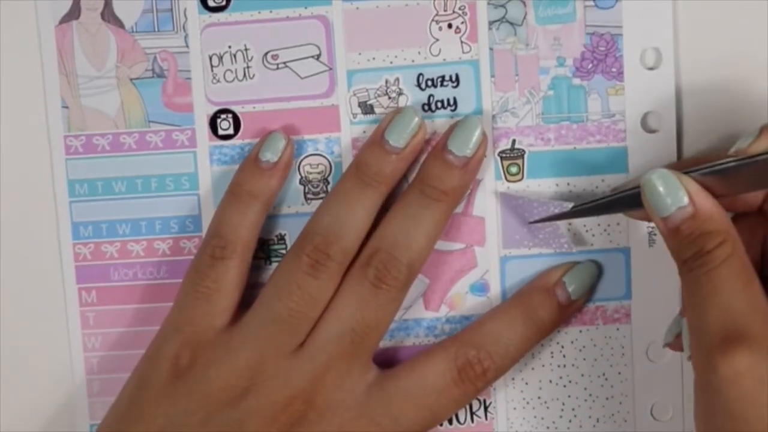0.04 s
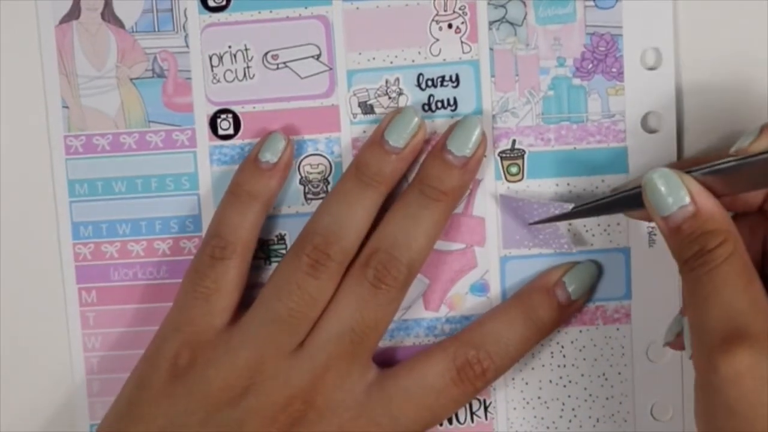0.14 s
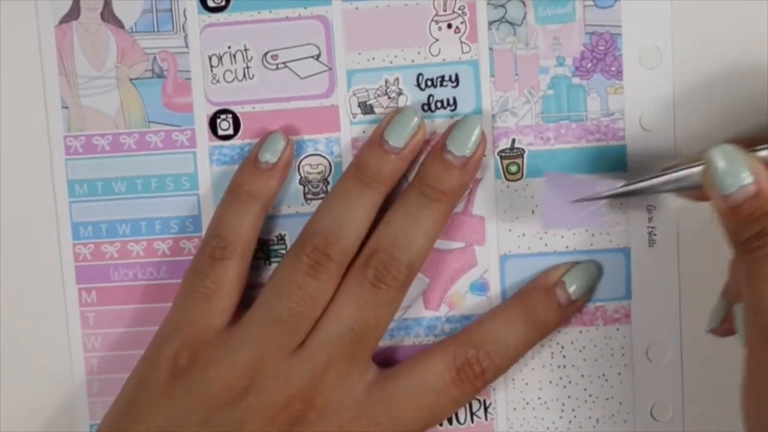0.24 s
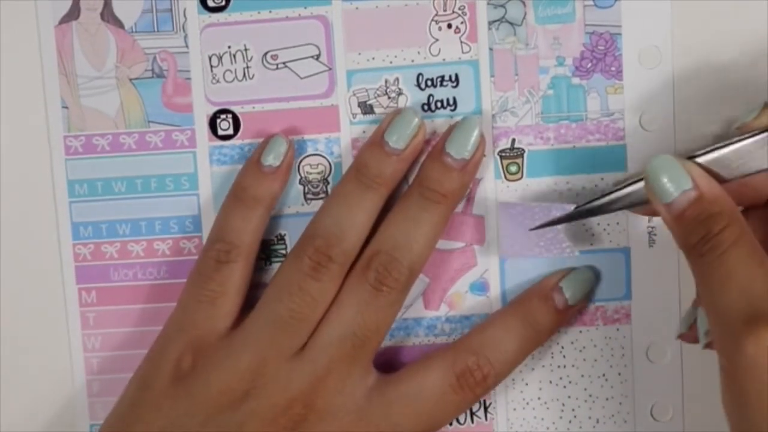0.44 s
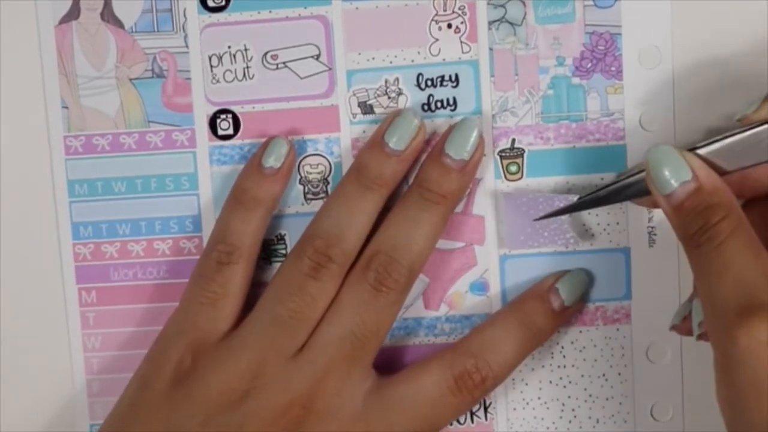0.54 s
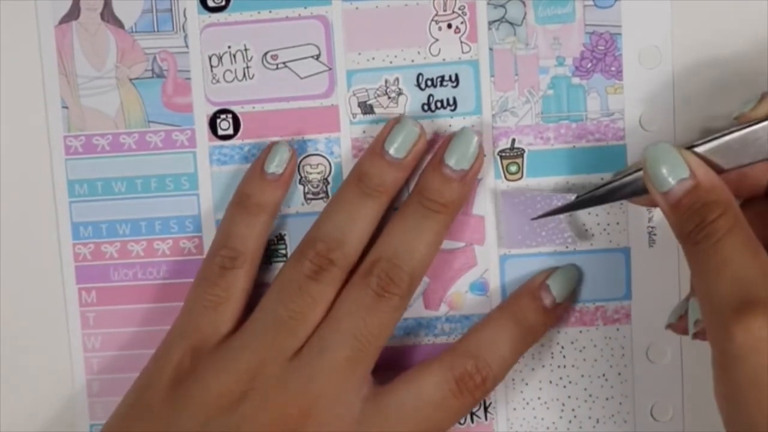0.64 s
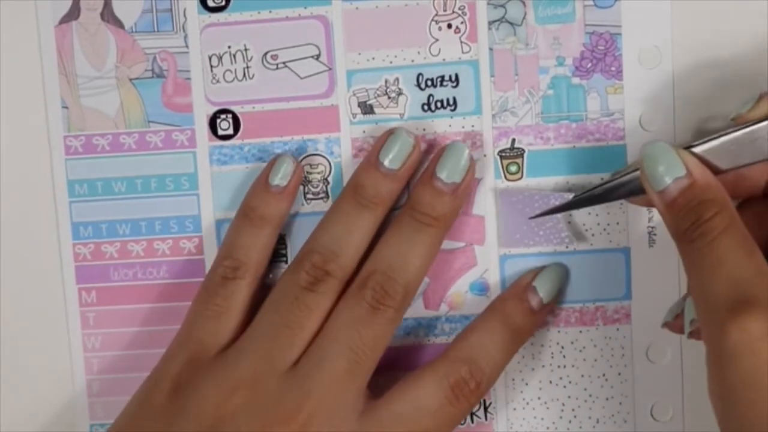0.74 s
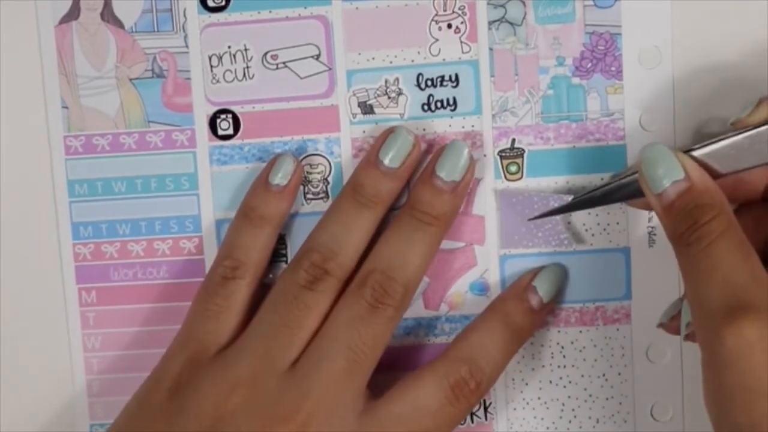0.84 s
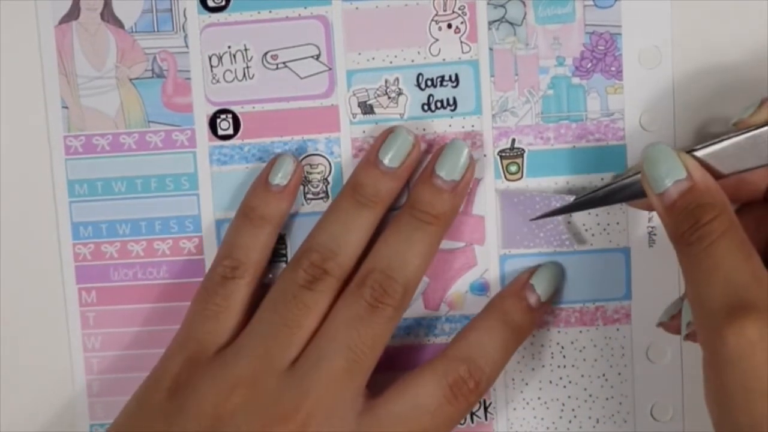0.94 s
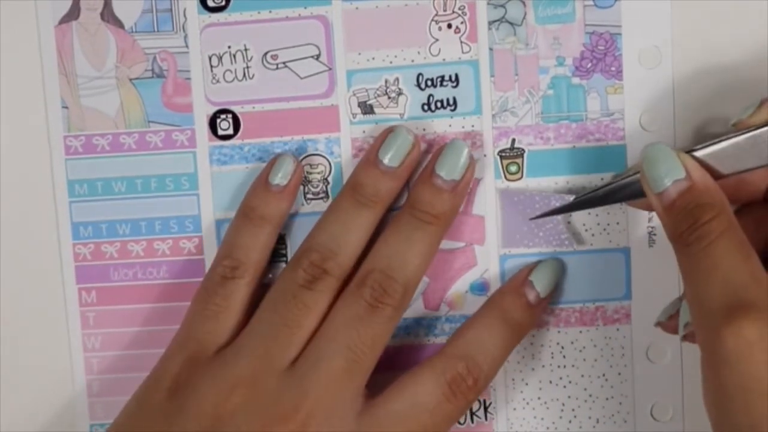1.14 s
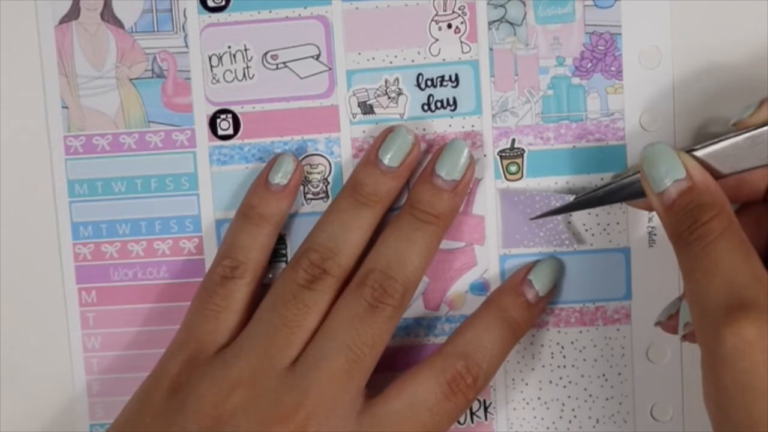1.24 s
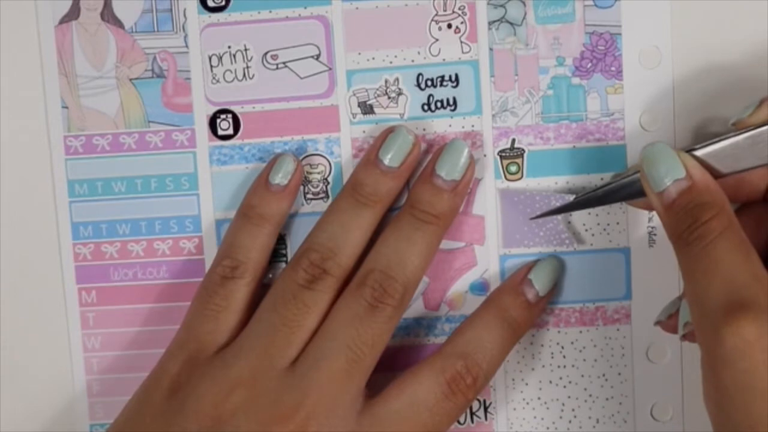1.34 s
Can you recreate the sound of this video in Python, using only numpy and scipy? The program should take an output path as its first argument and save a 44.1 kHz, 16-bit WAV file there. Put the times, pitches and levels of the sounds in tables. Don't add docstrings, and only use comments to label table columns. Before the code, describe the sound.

Close stereo microphones at a desk catch glue ticking apart under a sticker, a sharp clipped snap with a small thump and room echo, then a brief paper slide, tiny squeak and gentle touchdown.

```python
import sys
import numpy as np
from scipy import signal
from scipy.io import wavfile

SR = 44100
rng = np.random.default_rng(int(sys.argv[2]) if len(sys.argv) > 2 else 0)


def pcm_store(signal):
    levels = np.round(np.clip(np.atleast_2d(signal), -1, 1) * 32767)
    wavfile.write(sys.argv[1], SR, levels.astype(np.int16).T)


def boost_factor(decibels):
    exponent = np.asarray(decibels, float) / 20
    return 10 ** exponent


N = 61739
TIME_S = np.arange(N) / SR

SNAP_DB = -1.5
SHEET_THIN_HZ, TICK_THIN_HZ = 900, 2094

TICK_TIMES = [.0140, .0316, .0515, .0625, .0748, .0998, .1072, .1283, .1370, .1545, .1598, .1615, .1775,
              .1970, .2032, .2232]
# peak_db, pitch_hz, brightness_db
TICK_SOUNDS = [(-43, 4100, 1), (-31.5, 3370, -1), (-45, 2250, -9.5), (-38, 3800, 0), (-34.5, 2800, -18),
               (-35.5, 3200, -12.5), (-30.5, 2750, 3), (-42.5, 3000, -3.5), (-30.5, 2790, 1.5),
               (-43, 2200, -5), (-42.5, 2140, -8.5), (-27.5, 2860, 1), (-36.5, 2750, -14),
               (-30, 2800, -0.5), (-39.5, 3800, -15.5), (-39, 2900, -12.5)]
TOUCH_TIMES = [.7020, .7030, .7105]
# peak_db, pitch_hz, brightness_db
TOUCH_SOUNDS = [
    (-32.5, 5000, -11.5),
    (-34.5, 4000, -14.5),
    (-35.5, 1460, -4),
]
SLIP_TIMES = [.2283, .2302, .2310, .2332, .2352, .2367, .2385, .2415, .2445]


def rms_one(x):
    return x / np.sqrt(np.mean(x ** 2) + 1e-20)


def in_time(rows):
    s, value = np.transpose(rows)
    return np.interp(TIME_S, s, value)


def at_hz(points, hz):
    point_hz, value = np.transpose(points)
    return np.interp(np.log(hz), np.log(point_hz), value)


def click(s):
    return np.clip(1 - np.abs(np.arange(N) - s * SR), 0, 1)


def ring(clicks, hz, t60):
    radius = boost_factor(-60 / (t60 * SR))
    turn = 2 * np.pi * hz / SR
    return signal.lfilter([0, np.sin(turn)], [1, -2 * radius * np.cos(turn), radius ** 2], clicks + 1e-18)


def band(x, low_hz, high_hz):
    return signal.sosfilt(signal.butter(2, [low_hz, high_hz], "band", fs=SR, output="sos"), x)


def thin(x, cut_hz):
    return signal.sosfilt(signal.butter(4, cut_hz, "high", fs=SR, output="sos"), x)


def banded_noise(gain, alike, size=N):
    edges = 22 * 2 ** np.arange(0, 10, .5)
    white = rng.standard_normal((2, 2, size))
    out = 0
    for k, (low, high) in enumerate(zip(edges, edges[1:])):
        mid, side = band(white[k % 2], low, high)
        hz = np.sqrt(low * high)
        likeness = np.clip(alike(hz), 0, 1)
        out = out + gain(hz) * (np.sqrt(1 + likeness) * mid + np.sqrt(1 - likeness) * side * [[1], [-1]])
    return out


def crack(s, low_hz):
    t60_s, top_hz = 0.0039, 14000
    age = TIME_S - s
    burst = rng.standard_normal(N) * (age >= 0) * boost_factor(-60 * np.abs(age) / t60_s)
    return band(burst, low_hz, top_hz)


def snap():
    # left_db, right_db, brightness_db
    slips = [
        (2, 2, -4),
        (-8, -6, -8),
        (0, 1, -11),
        (-5, -3, -11),
        (-22, -15, 0),
        (-19, -18, -4),
        (-16, -16, -9),
        (-21, -23, -12),
        (-21, -21, -12),
    ]
    return sum(slip(s, *row) for s, row in zip(SLIP_TIMES, slips))


def slip(s, left_db, right_db, bright_db):
    # pitch_hz, level_db, t60_s
    sticker_modes = [(2860, -6.5, 0.0069), (3200, 1.5, 0.0037), (3535, -9.5, 0.0045), (3920, -12.5, 0.009),
                     (3940, -12, 0.0042)]
    # pitch_hz, level_db, t60_s
    page_modes = [(1134, -42.5, 0.004), (1425, -18, .01), (1806, -40, 0.0064), (5743, -22.5, 0.015)]
    crack_low_hz, crack_pan_db = 4500, 8

    def body(modes):
        return sum(boost_factor(db + rng.normal(0, 2.8, (2, 1))) * ring(click(s), hz, t60) for hz, db, t60 in modes)

    sheet = band(body(sticker_modes), 2300, 4410)
    page = body(page_modes)
    each_ear = np.array([crack(s, crack_low_hz), crack(s, crack_low_hz)])
    cracks = crack(s, crack_low_hz) + 1.6 * each_ear
    cracks = boost_factor([[bright_db + crack_pan_db / 2], [bright_db - crack_pan_db / 2]]) * cracks
    gain = boost_factor([[SNAP_DB + left_db], [SNAP_DB + right_db]])
    return gain * thin(sheet + page + cracks, SHEET_THIN_HZ)


def ticks(times, rows, cut_hz, crack_low_hz):
    cycles = 20.5
    out = 0
    for s, (db, hz, bright_db) in zip(times, rows):
        low = ring(click(s), hz, cycles / hz)
        high = boost_factor(-3.5) * ring(click(s), 1.6 * hz, .6 * cycles / hz)
        out = out + boost_factor(db - 3.5) * (low + high + boost_factor(bright_db) * crack(s, crack_low_hz))
    return thin(out, cut_hz)


def crackle():
    # start_s, level_db
    pull = [
        (0, -68.5),
        (.05, -62),
        (.12, -60),
        (.2, -53),
        (.226, -70),
        (.232, -83.5),
    ]
    per_s, spread_db = 3000, 2.5
    sizes = boost_factor(spread_db * np.minimum(rng.exponential(1, N), 5)) * rng.choice([-1, 1], N)
    grains = sizes * (rng.random(N) < per_s / SR)
    body = thin(ring(grains, 2800, .005), TICK_THIN_HZ)
    return boost_factor(in_time(pull)) * rms_one(body + boost_factor(16.5) * band(grains, 7000, 13000))


def thuds():
    drop = click(SLIP_TIMES[0] + 0.0027)
    pushes = boost_factor(-32.5) * drop + boost_factor(-52) * sum(click(s) for s in TOUCH_TIMES[1:])
    page = ring(pushes, 369, 0.053)
    desk_hz = 286
    swell = ring(drop, desk_hz, 0.36) / 150
    return band(page + boost_factor(-56) * ring(swell, desk_hz, 0.13), 180, 600)


def slide():
    # start_s, level_db
    stroke = [
        (0.6, -80),
        (0.622, -76),
        (0.698, -54.5),
        (0.702, -49.5),
        (0.762, -54),
        (0.802, -84.5),
        (0.84, -86),
    ]
    # pitch_hz, level_db
    paper_colour = [(530, -32), (900, -7), (1090, -11), (1420, -1.5), (2230, -8), (3320, 0.5),
                    (15000, -15.5)]
    hiss = rms_one(banded_noise(lambda hz: boost_factor(at_hz(paper_colour, hz) - 33 * (hz < 900)), lambda hz: .3))
    squeak_s, squeak_length_s, squeak_hz, squeak_db = .650, .010, 2250, -59
    age = (TIME_S - squeak_s) / squeak_length_s
    squeak = rms_one(ring(rng.standard_normal(N), squeak_hz, 0.028)) * np.exp(-age ** 2)
    moving = (TIME_S > stroke[0][0]) & (TIME_S < stroke[-1][0])
    return boost_factor(in_time(stroke) + 2.5) * moving * hiss + boost_factor(squeak_db) * squeak


def desk(x):
    # delay_s, left_db, right_db
    bounces = [
        (.0017, -10, -9),
        (.0027, -9, -8),
        (.0050, -12, -11),
    ]
    pan_db = -3.4
    t = np.arange(N)
    out = x
    for delay_s, left_db, right_db in bounces:
        out = out + boost_factor([[left_db], [right_db]]) * np.interp(t - delay_s * SR, t, x, left=0)
    return out * boost_factor([[pan_db / 2], [-pan_db / 2]])


def releases():
    times, rows = TICK_TIMES + TOUCH_TIMES, TICK_SOUNDS + TOUCH_SOUNDS
    small = sum(boost_factor(row[0] - 1.5) * click(s) for s, row in zip(times, rows))
    return small + boost_factor(SNAP_DB) * click(SLIP_TIMES[0])


def room(x):
    # pitch_hz, level_db
    tail_colour = [(300, -19), (800, -27), (1400, -7), (2300, -10), (3300, 0.5), (5200, -10), (9500, -16),
                   (14500, -25.5)]
    # pitch_hz, t60_s
    tail_t60 = [(250, .4), (1500, 0.97), (3500, 0.61), (6000, 0.61), (9000, 0.38), (14000, .25)]
    level_db, rise_s, hold_s, sag_db_per_s = -13, 0.012, 0.11, 32.5
    t = np.arange(SR) / SR
    late = np.maximum(t - hold_s, 0)
    tail = banded_noise(lambda hz: boost_factor(at_hz(tail_colour, hz) - 60 * late / at_hz(tail_t60, hz)),
                        lambda hz: 150 / hz, size=SR)
    tail = tail * np.clip(t / rise_s, 0, 1) ** 2 * boost_factor(-sag_db_per_s * t)
    return boost_factor(level_db - 9) * signal.fftconvolve(tail, x[None], axes=1)[:, :N]


def floor():
    # pitch_hz, level_db
    hiss_colour = [(20, -7), (45, -4.5), (150, -3.5), (300, -4), (680, -8), (2000, -13), (8000, -19),
                   (15500, -25.5)]
    # pitch_hz, likeness (0 to 1)
    hiss_likeness = [(40, 0.24), (130, 0.2), (290, 0.15), (640, .03), (14900, 0.025)]
    # start_s, level_db
    hum_level = [(0.0, -61.5), (0.136, -55.5), (0.174, -61), (0.486, -56.5), (0.532, -70.5), (0.584, -63),
                 (0.732, -52.5), (0.778, -80), (0.802, -61.5), (1.02, -60.5), (1.042, -64), (1.4, -65)]
    hum_hz, hum_width_hz, hum_rough_db = 122, 8, -15
    hiss = banded_noise(lambda hz: boost_factor(at_hz(hiss_colour, hz)), lambda hz: at_hz(hiss_likeness, hz))
    white = rng.standard_normal((3, N + SR))
    wobble = rms_one(ring(white[:2], hum_hz, 2.2 / hum_width_hz)[:, SR:])
    hum = np.sqrt(2) * np.sin(2 * np.pi * hum_hz * TIME_S)
    hum = hum + boost_factor(hum_rough_db) * (wobble[0] + wobble[1] * [[1], [-1]])
    drone = rms_one(ring(white[2], 273, 0.05)[SR:])
    return boost_factor(-58.5 + 3.5) * rms_one(hiss) + boost_factor(in_time(hum_level)) * hum + boost_factor(-66.5) * drone


def scene():
    peel = ticks(TICK_TIMES, TICK_SOUNDS, TICK_THIN_HZ, 7000)
    touches = ticks(TOUCH_TIMES, TOUCH_SOUNDS, SHEET_THIN_HZ, 3500)
    small = peel + touches + crackle()
    return desk(small) + snap() + thuds() + room(releases()) + slide() + floor()


def roll_off(x):
    return signal.sosfilt(signal.butter(12, 15540, fs=SR, output="sos"), x)


def record(dry):
    cut = signal.sosfilt(signal.cheby2(8, 25, 16000, fs=SR, output="sos"), dry)
    return roll_off(np.clip(cut, -1, 1))


dry = scene()
out = record(dry)
pcm_store(out)
```